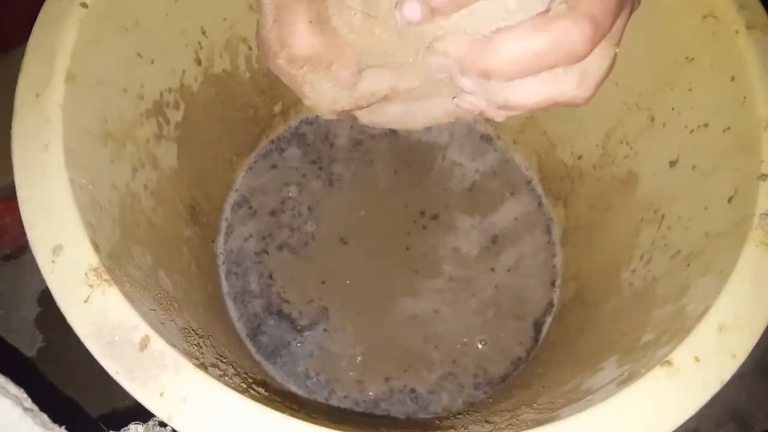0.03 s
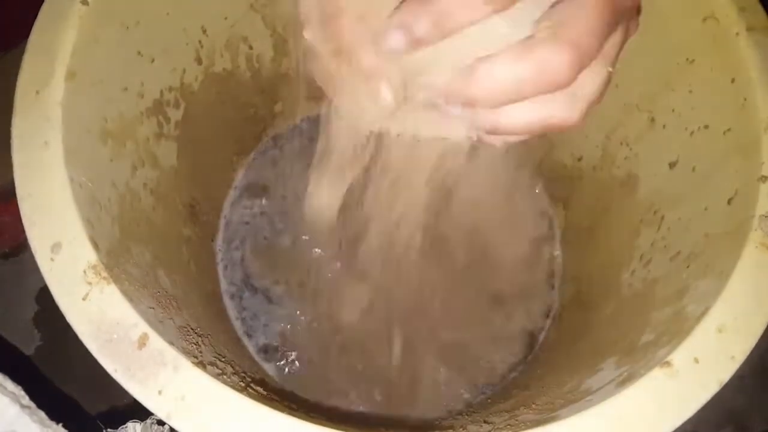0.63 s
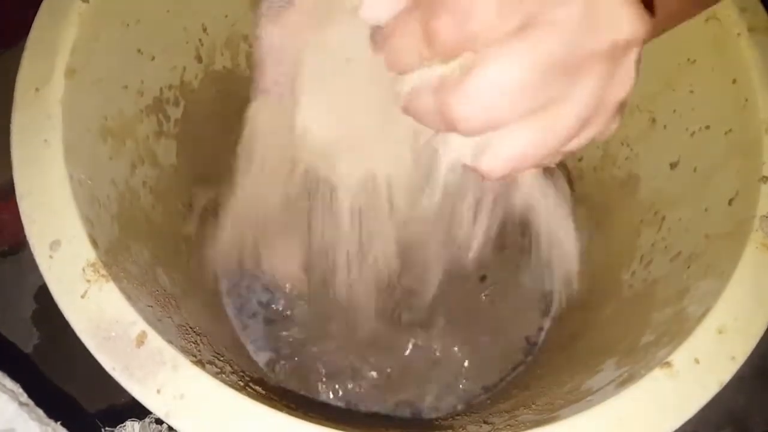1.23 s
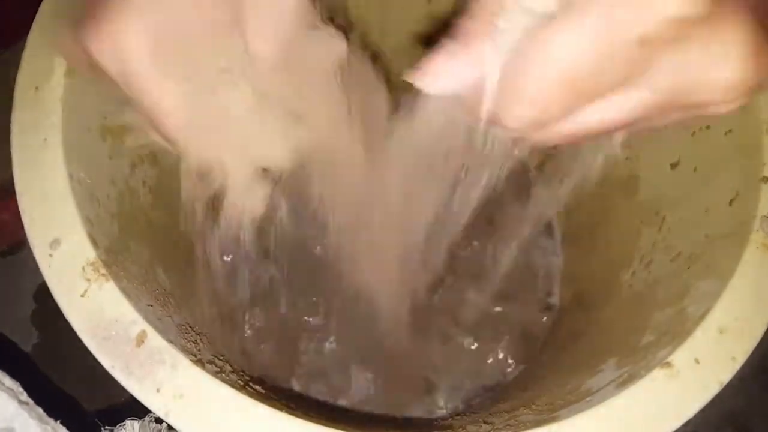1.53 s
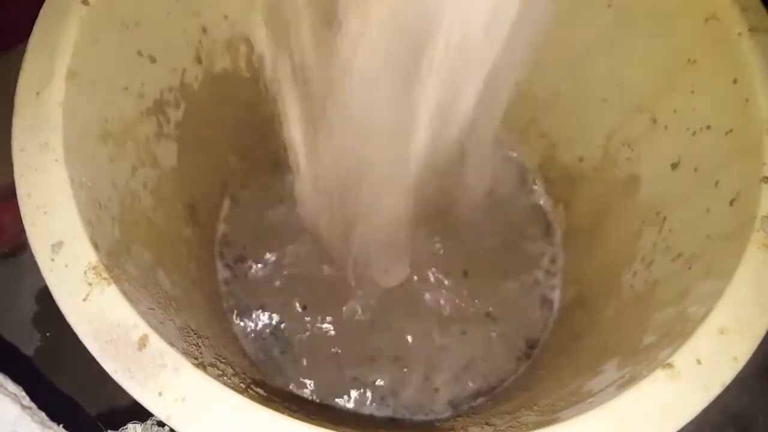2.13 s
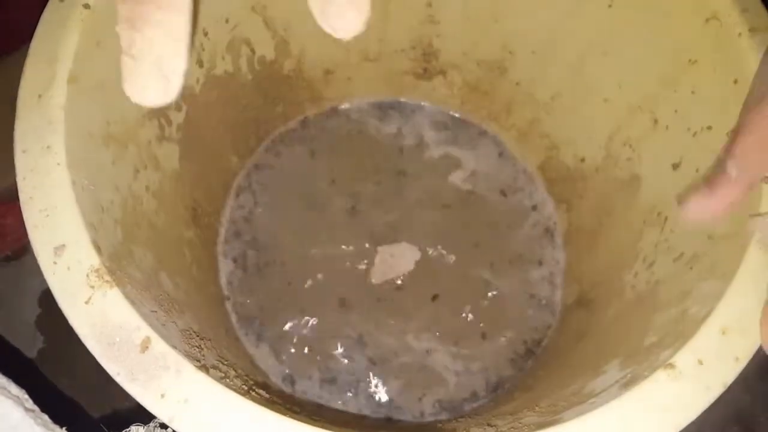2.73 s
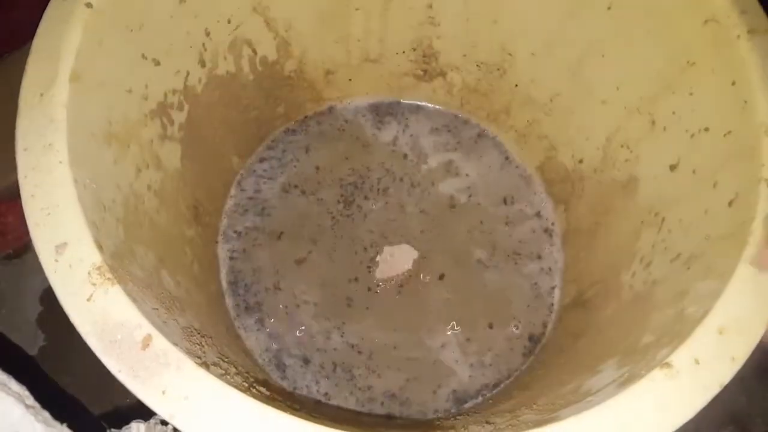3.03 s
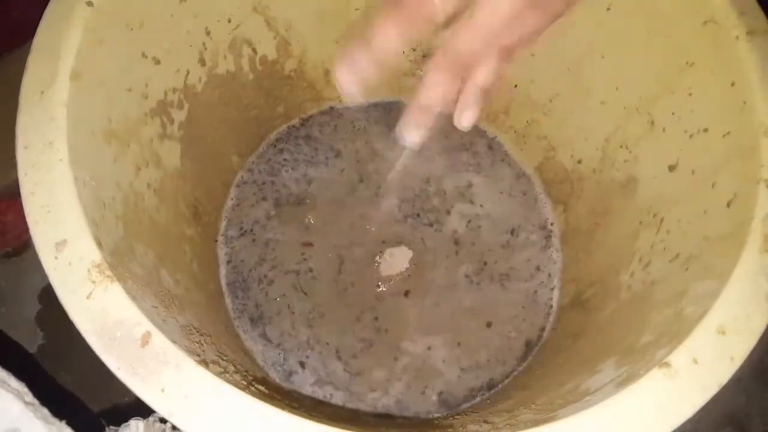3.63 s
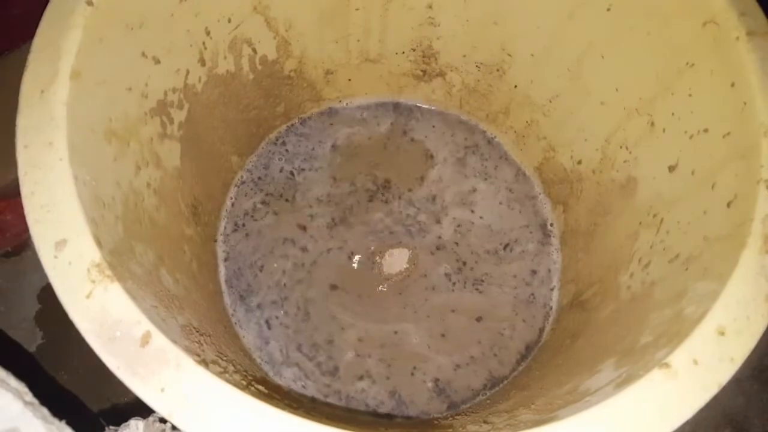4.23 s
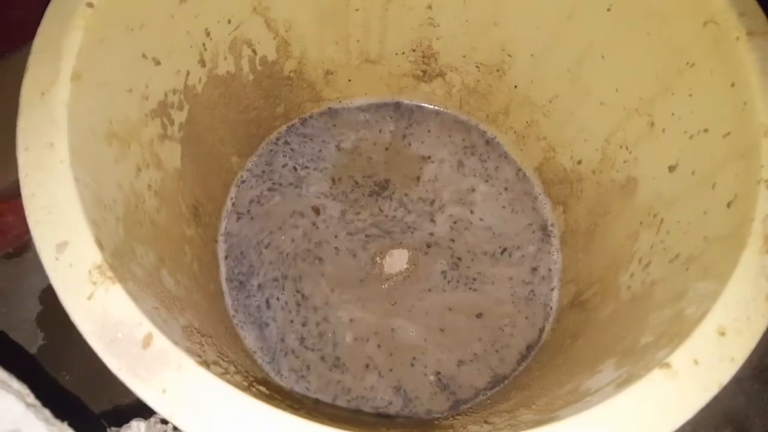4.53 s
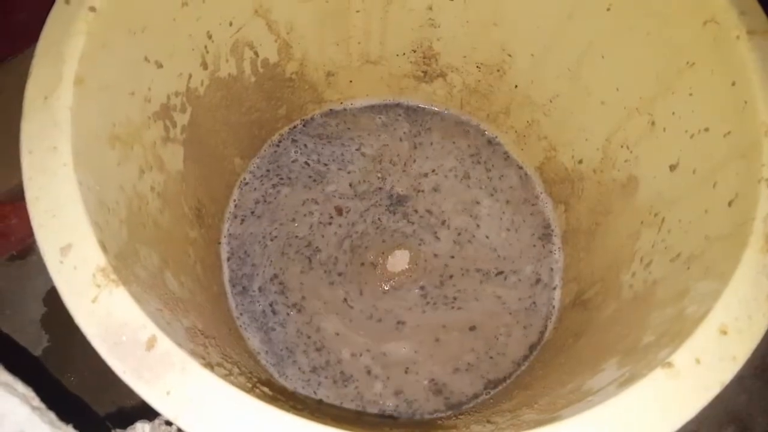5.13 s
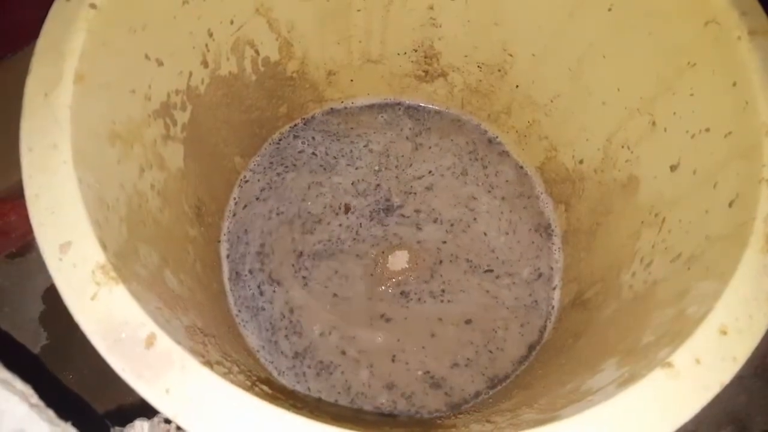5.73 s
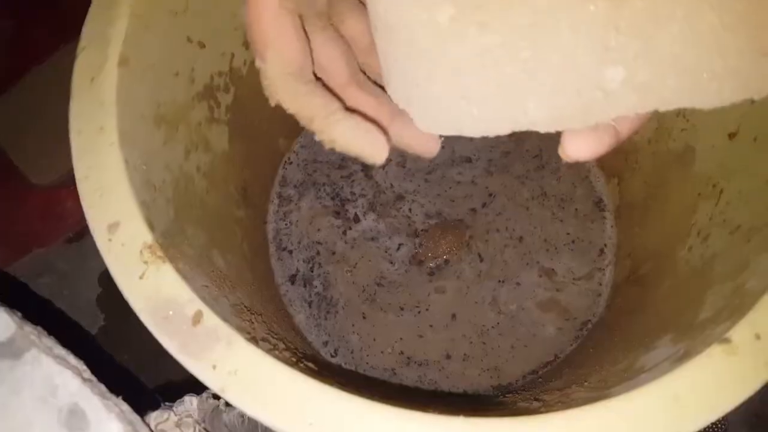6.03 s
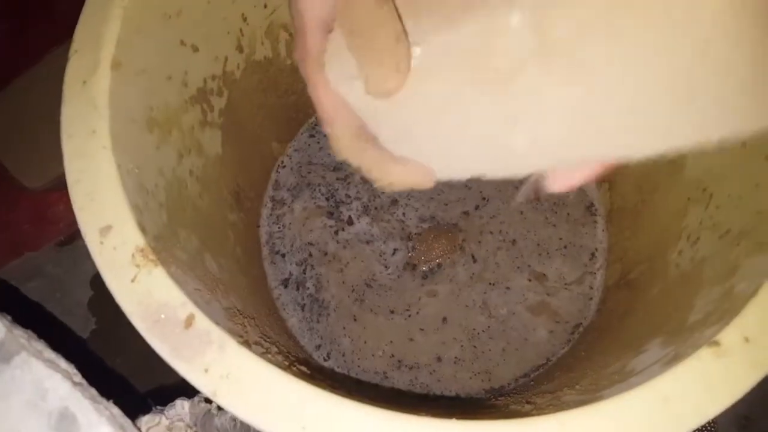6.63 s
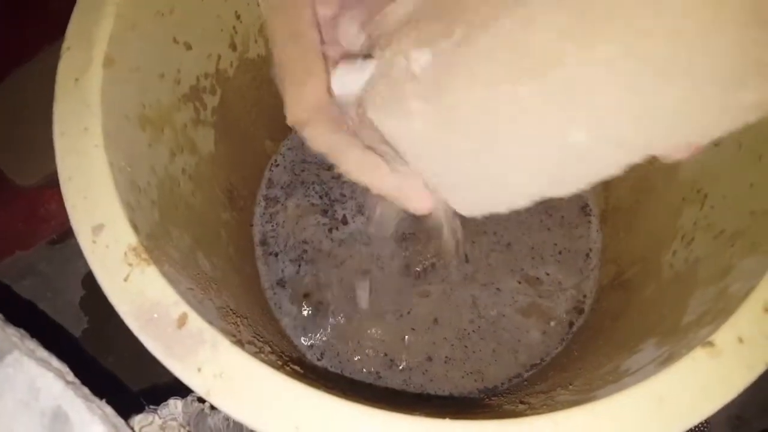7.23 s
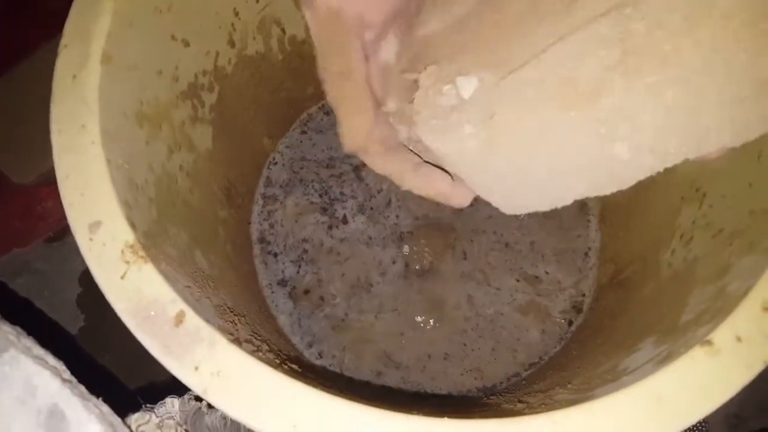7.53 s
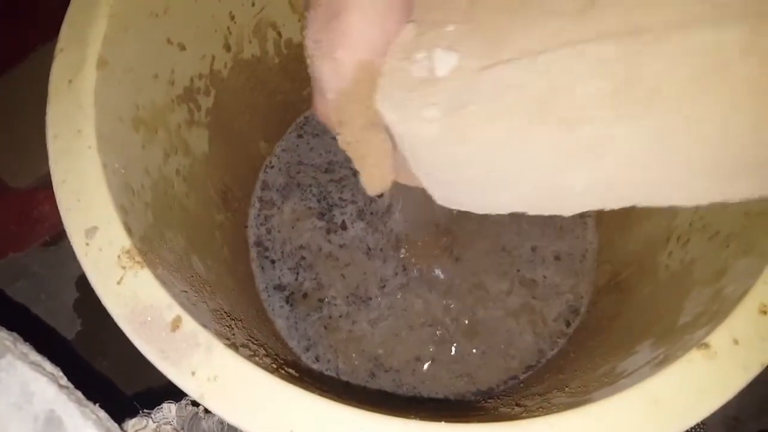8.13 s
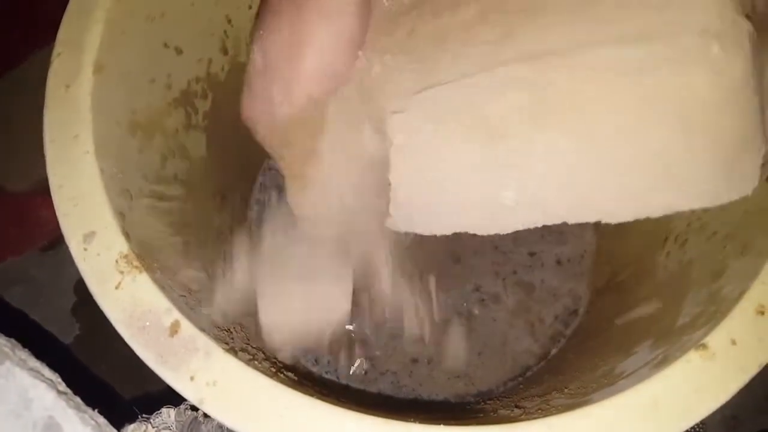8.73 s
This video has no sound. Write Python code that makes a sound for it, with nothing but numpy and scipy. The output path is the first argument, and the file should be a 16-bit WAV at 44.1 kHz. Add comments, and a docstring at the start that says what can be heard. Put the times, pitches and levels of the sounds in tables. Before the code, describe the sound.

From about 0.3 seconds, a block of dry sand crumbles close by into a plastic tub of water: brittle cracks, a grainy hiss, a fizz of small bubbles and many quick plops. The pour surges unevenly, with a low gurgle around 2 seconds, and dies away by 2.7. Light crumbs and soft brushes of sandy hands follow, with a sharp tick near 3.6 and a few small plops near 3.9. After a lull, a second block grinds faintly against the palms from about 6 seconds, shedding specks with small ticks and plinks. At 8.7 it cracks, and lumps fall in with a brief hiss and two loud plops. Throughout, a nearby cricket chirps high and evenly, about eight times a second, echoing slightly off the yard walls, with distant crickets, a faint low rumble and an electrical hum behind.

```python
"""A hard-walled yard: hands crumble a block of dry sand over muddy water in a plastic tub, pause, then
start on a second block. The block cracks and sheds crumbs, lumps plop in, and the falling sand hisses
and drags air under in a fizz of small bubbles. A cricket ticks away nearby with strokes of its wings,
others farther off, over a low rumble and a mains hum."""
import sys
import numpy as np
from scipy import signal
from scipy.fft import rfft, irfft
from scipy.io import wavfile
from scipy.ndimage import uniform_filter1d

SR = 44100
rng = np.random.default_rng(int(sys.argv[2]) if len(sys.argv) > 2 else 0)


def dump_mix(stems):
    """Bounce the given channels to the path in sys.argv[1] as a 16-bit WAV at rate SR."""
    frames = np.atleast_2d(stems).T  # one column per channel
    limited = np.clip(frames, -1, 1)  # hard clip at full scale
    pcm = np.round(limited * 32767).astype(np.int16)
    wavfile.write(sys.argv[1], SR, pcm)


N = 388080
TIME = np.arange(N) / SR

# low sloshing reaches both microphones in step, higher rings out of step: f/Hz, phase gap/rad
PHASE_GAP = [(500, 0.073), (900, 0.3), (1200, 1.42), (1600, 1.87), (2500, 1.75)]


def from_db(db):
    return 10 ** (np.asarray(db) / 20)


def rms_one(x):
    return x / np.sqrt(np.mean(x ** 2) + 1e-20)


def together(*levels_db):
    """Level in dB of unrelated sounds heard at once."""
    return 10 * np.log10(sum(from_db(db) ** 2 for db in levels_db))


def in_time(rows):
    """Each column of an automation curve at every sample."""
    times, *columns = np.transpose(rows)
    return [np.interp(TIME, times, column) for column in columns]


def at_hz(points, hz):
    """Reads a curve on a log-frequency axis."""
    known_hz, values = np.transpose(points)
    return np.interp(np.log(np.maximum(hz, 1)), np.log(known_hz), values)


def colour(x, spectrum, size=4096):
    """Minimum-phase EQ with the given curve."""
    gain = from_db(at_hz(spectrum, np.fft.rfftfreq(size, 1 / SR)))
    cepstrum = irfft(np.log(gain))
    cepstrum[1:size // 2] *= 2
    cepstrum[size // 2 + 1:] = 0
    impulse = irfft(np.exp(rfft(cepstrum)))
    return signal.oaconvolve(np.atleast_2d(x), impulse[None], axes=1)[:, :N]


def drift(rate):
    """Random wobble of rms 1, changing about rate times a second."""
    knots = rng.standard_normal(8192)
    return rms_one(np.interp(TIME * rate, np.arange(len(knots)), knots))


def add(out, s, sound):
    """Mixes a short sound in at time s."""
    start = int(s * SR)
    first, last = max(start, 0), min(start + sound.shape[-1], N)
    if last > first:
        out[..., first:last] += sound[..., first - start:last - start]


def swells(rows, attack_share=0.17, release_share=0.21, least_release_s=0.0064):
    """Envelope in dB of events (t/s, length/s, level/dB); long ones swell and fade more slowly."""
    power = np.full(N, 1e-12)
    for s, length, db in rows:
        t = TIME[:int((2 * length + .2) * SR)]
        rise = 1 - np.exp(-t / (attack_share * length))
        fade = np.exp(-np.maximum(t - length, 0) / (least_release_s + release_share * length))
        add(power, s, (from_db(db) * rise * fade) ** 2)
    return 10 * np.log10(power)


def grains(per_s, spread_db):
    """Random clicks of uneven size."""
    sizes = from_db(spread_db * np.minimum(rng.exponential(1, N), 4)) * rng.choice([-1, 1], N)
    return sizes * (rng.random(N) < per_s / SR) / np.sqrt(per_s)


def resonators(clicks, low_hz, high_hz, cycles, count):
    """Each click rings one of count pitches, each with its own stereo spot, dying 60 dB over cycles."""
    out, dealt = np.zeros((2, N)), rng.integers(0, count, N)
    spots = rng.uniform(.6, 1.4, count) * rng.choice([-1, 1], count)
    for k, hz in enumerate(np.geomspace(low_hz, high_hz, count)):
        r, w = from_db(-60 * hz / (cycles * SR)), 2 * np.pi * hz / SR  # pole radius and angle
        strikes = clicks * (dealt == k) + 1e-18
        ring = signal.lfilter([w, -w * r * np.cos(w)], [1, -2 * r * np.cos(w), r * r], strikes)
        right_lag = int(spots[k] * at_hz(PHASE_GAP, hz) / w)
        out += [ring, np.roll(ring, right_lag)]
    return out


def reflections(x, t60_s, gap_s):
    """Dense dying echoes of unit energy, different at each microphone."""
    t = TIME[:SR // 4]
    tail = rng.standard_normal((2, len(t))) * from_db(-60 * t / t60_s) * (t > gap_s)
    tail /= np.sqrt(np.sum(tail ** 2, axis=1, keepdims=True))
    return signal.oaconvolve(np.atleast_2d(x), tail, axes=1)[:, :N]


def yard_ambience():
    """Distant rumble, nearly mono in the bass, with a wavering mains hum and a thin hiss."""
    # left-right likeness of the rumble: f/Hz, correlation
    likeness = [(50, 0.97), (150, 0.97), (300, .84), (600, 0.58), (1200, 0), (2500, 0)]
    # tone of the rumble: f/Hz, level/dB
    rumble_eq = [(25, -28), (43, -6.5), (70, -8), (95, -2.5), (150, -5.5), (200, -3.5), (320, -14.5),
                 (520, -12.5), (630, -19.5), (900, -16), (1400, -23.5), (2650, -29.5), (4500, -37.5),
                 (5800, -36), (9000, -86)]
    # partials of the hum: f/Hz, rms level/dB
    partials = [(100, -59.5), (200, -60.5), (350, -67), (445, -67)]
    # tone of the hiss: f/Hz, level/dB
    air_eq = [(3000, -41), (5500, -8), (7000, -1), (9000, -13), (12000, 1), (14500, 1), (16000, 5)]
    alike = at_hz(likeness, np.fft.rfftfreq(N, 1 / SR))
    mid, side = rfft(rng.standard_normal((2, N)))
    noise = irfft(np.sqrt(1 + alike) * mid + np.sqrt(1 - alike) * side * [[1], [-1]], N)
    rumble = from_db(-49) * rms_one(colour(noise, rumble_eq))
    hum = sum(from_db(db) * np.sqrt(2) * np.sin(2 * np.pi * hz * TIME + .5 * drift(5.4))
              for hz, db in partials)
    air = from_db(-65) * rms_one(colour(rng.standard_normal((2, N)), air_eq))
    return rumble + hum + air


def far_crickets(hz=7250, width_hz=750):
    """Distant crickets merge into one flickering band, louder on the right."""
    # strength of the chorus: t/s, level/dB
    chorus = [(0, -48), (2.5, -53), (5.9, -53), (7.2, -50.5), (8.8, -50.5)]
    band = signal.butter(2, [hz - width_hz / 2, hz + width_hz / 2], "band", fs=SR, output="sos")
    song = rms_one(signal.sosfilt(band, rng.standard_normal((2, N))))
    return song * from_db(in_time(chorus)[0] + 0.27 * drift(50) + np.array([[-7], [-1]]))


def chirp_times():
    """The near cricket keeps a steady pace in runs, and stumbles once."""
    # runs of chirps: t/s, period/s
    runs = [(.01, .1314), (.93, .1242), (2.299, .1229), (3.778, .1252), (4.404, .1228), (5.018, .1254),
            (5.762, .107), (5.869, .1225), (6.981, .1235), (7.84, .1229)]
    ends = [s for s, period in runs[1:]] + [N / SR]
    return np.concatenate([np.arange(s, end - period / 2, period)
                           for (s, period), end in zip(runs, ends)])


def near_cricket(wing_hz=7260, fall_hz=220, stroke_s=0.00229, lead_s=.0203, lead_db=-1.5, rough=0.45):
    """Two quick wing strokes per chirp, each a rough tone that falls in pitch; the walls draw them out."""
    # resonance of the wings: f/Hz, level/dB
    wing_eq = [(5200, -35), (6000, -14), (6600, -0.5), (7300, -4), (7900, 1), (8300, -43), (9200, -42),
               (11500, 8), (14500, 0)]
    # strength of the song: t/s, level/dB, left re right/dB
    song = [(0, -33.5, -14), (2.5, -33.5, -8), (3.8, -32.5, -10), (5.5, -35, -7.5), (6, -37.5, -4),
            (7, -35.5, -8), (8.8, -35.5, -8)]
    chirps, t = np.zeros(N), TIME[:SR // 50] - .01
    for s in chirp_times():
        for ahead_s, stroke_db in ((lead_s, lead_db), (0, 0)):
            noise = rng.standard_normal((2, len(t)))
            jitter, shimmer = rms_one(uniform_filter1d(uniform_filter1d(noise, size=28), size=20))
            hz = wing_hz + rng.normal(0, 60) - fall_hz * t / stroke_s
            phase = 2 * np.pi * np.cumsum(hz) / SR + rough * jitter
            tone = (np.sin(phase) + from_db(-29) * np.sin(2 * phase)) * (1 + rough * shimmer / 2)
            # the wings touch lightly before and after the hard middle of the stroke
            pressure = np.exp(-(t / stroke_s) ** 2 / 2) + 0.1 * np.hanning(len(t))
            add(chirps, s - ahead_s + t[0], from_db(stroke_db + rng.normal(0, 0.66)) * tone * pressure)
    chirps = colour(chirps, wing_eq)
    turn = 1.4 * drift(2.9)  # small movements shift the pattern of echoes
    echoes = sum(reflections(chirps * share, t60_s=0.2, gap_s=0.0034)
                 for share in (np.cos(turn), np.sin(turn)))
    direct = from_db([[-3], [-1]]) * chirps
    level_db, left_db = in_time(song)
    return (direct + from_db(2.5) * echoes) * from_db([level_db + left_db, level_db])


def tub(x):
    """Sound flutters briefly between the plastic walls; the right side loses treble."""
    # shading of the right microphone: f/Hz, level re left/dB
    shade_eq = [(500, 0), (2100, -1), (3000, 0), (4500, -2.5), (7000, 2.5), (8300, -8.5), (9500, -7),
                (11200, -13), (13000, 0), (16000, -22)]
    left, right = x + from_db(-6) * reflections(x, t60_s=0.03, gap_s=0.00209)
    return np.vstack([left, colour(right, shade_eq)])


def handling():
    """The second block grinds dully against the palms."""
    # the block shifting in the hands: t/s, length/s, level/dB
    shifts = [(5.6, 5.5, -56)]
    grind_eq = [(120, -20), (250, 16), (520, 3.5), (900, -3.5), (2000, -34)]  # f/Hz, level/dB
    grind = colour(grains(3000, spread_db=5.5), grind_eq)
    return rms_one(grind) * from_db(swells(shifts))


def rustle():
    """Sandy skin brushes over sand with a dull, grainy sound."""
    # strokes of the hands: t/s, length/s, level/dB
    strokes = [(.08, .07, -53), (2.73, 0.091, -56.5), (3.02, 0.054, -56), (3.82, .08, -57.5),
               (6.56, 0.16, -61), (6.84, 0.13, -59.5), (7.2, 0.37, -61.5), (7.82, 0.37, -60),
               (8.58, 0.033, -48.5), (8.72, .08, -49)]
    skin_eq = [(500, -8), (850, 3), (1500, 0), (2400, -6.5), (5000, -8)]  # f/Hz, level/dB
    rub = resonators(grains(5000, spread_db=3.5), low_hz=700, high_hz=2450, cycles=6.7, count=10)
    return rms_one(colour(rub, skin_eq)) * from_db(swells(strokes) + 2.5)


def crumbs(level_db):
    """Single crumbs each trap one tiny, clear-ringing bubble."""
    pings = resonators(grains(200, spread_db=1.5), low_hz=2063, high_hz=5400, cycles=27, count=18)
    return rms_one(pings) * from_db(level_db + 3)


def gulp(flutter_db=2.5):
    """The hollow that the heaviest fall digs in the water grows, so its note sinks."""
    # note of the hollow: t/s, f/Hz, level/dB
    note = [(1.75, 394, -119), (1.85, 324, -46), (2.0, 293.3, -80), (2.12, 232, -46), (2.25, 221, -53),
            (2.33, 205, -79)]
    hz, level_db = in_time(note)
    phase = 2 * np.pi * np.cumsum(hz + 10 * drift(40)) / SR
    return np.sin(phase) * from_db(level_db - flutter_db * drift(37))


def churn(flow_db):
    """The bulk of the sand folds in larger, duller bubbles, surging as heaps slump."""
    # whole heaps sliding into the water: t/s, length/s, level/dB
    slumps = [(.28, .5, -60), (1.82, 0.16, -44.5), (2.05, .27, -55), (8.76, 0.054, -45)]
    # tone of the gurgle: f/Hz, level/dB
    gurgle_eq = [(100, -25), (220, 4.5), (330, 5), (500, 4.5), (800, -5), (1400, -34), (3000, -28)]
    bubbles = resonators(grains(500, spread_db=3), low_hz=221, high_hz=807, cycles=10, count=11)
    return rms_one(colour(bubbles, gurgle_eq)) * from_db(together(flow_db, swells(slumps)))


def sand_hiss(level_db):
    """Fine grains rub and patter down in clumps."""
    # tone of the dry grains: f/Hz, level/dB
    hiss_eq = [(600, -15), (1000, -12.5), (2000, 1), (4000, 2), (6500, 0.5), (9000, 3.5), (10800, -2),
               (12500, -1.5), (16000, -2)]
    patter = np.array([grains(3500, spread_db=3.5) for side in range(2)])
    return rms_one(colour(patter, hiss_eq)) * from_db(level_db + 8.5 + 1.75 * drift(110))


def fizz(level_db):
    """Sand drags air under in clumps, and crowds of small bubbles ring."""
    # tone of the bubble crowd: f/Hz, level/dB
    fizz_eq = [(500, -37), (700, -7), (840, 2.5), (1100, 1), (1320, 0), (1550, 3), (2400, -1.5),
               (3200, -2.5), (5000, -4), (7000, -12.5), (10000, -41)]
    bubbles = resonators(grains(1500, spread_db=2.5), low_hz=764, high_hz=7120, cycles=28, count=32)
    return rms_one(colour(bubbles, fizz_eq)) * from_db(level_db + 2.6 + 2.6 * drift(60))


def cracks(rise_s=0.0016, t60_s=0.013, spread_db=3.5):
    """Each crack is a rush of tiny, uneven fractures that swells and dies within milliseconds."""
    # dry cracks of the block and sharp spatters: t/s, level/dB
    hits = [(0.128, -38), (.246, -42), (0.313, -27), (.3984, -27), (0.408, -30), (.5301, -24.5),
            (0.7377, -28), (0.963, -35), (1.107, -33), (1.192, -36), (1.3283, -29.5), (1.593, -32),
            (1.6324, -30), (1.7299, -28), (1.9513, -22.5), (2.023, -23), (2.0618, -35), (2.368, -39),
            (2.999, -43), (3.567, -26.5), (4.23, -50), (6.2197, -49), (6.4467, -50), (7.073, -36),
            (7.332, -44), (7.878, -37.5), (8.088, -38), (8.703, -29)]
    # brittle tone of a crack: f/Hz, level/dB
    crack_eq = [(600, -49), (2000, 9), (4000, 11), (6500, 19), (9000, 18.5), (16000, 8)]
    out, t = np.zeros((2, N)), TIME[:SR // 8]
    envelope = (1 - np.exp(-t / rise_s)) * from_db(-60 * t / t60_s)
    for s, level_db in hits:
        sizes = from_db(spread_db * np.minimum(rng.exponential(1, (2, len(t))), 4))
        fractures = rms_one(sizes * rng.standard_normal(sizes.shape))
        add(out, s, from_db(level_db - 6) * fractures * envelope)
    return colour(out, crack_eq)


def plops(cavity_rise_s=0.00061, slap_rise_s=0.00018):
    """Each lump slaps the air in the tub and opens a cavity whose ring sags as it deepens."""
    # lumps hitting the water: t/s, level/dB, cavity f/Hz, slap trim/dB
    lumps = [(0.284, -23.5, 1130, 11.5), (.286, -17, 2370, -10), (.351, -23.5, 1570, -13),
             (.369, -29, 840, -13), (0.386, -24.5, 1750, 3), (.3986, -20.5, 1580, 8),
             (.428, -23, 1620, -17), (.458, -24.5, 1130, 2.5), (.482, -27.5, 930, 3), (.5, -31, 1160, -12),
             (.5309, -16.5, 1480, 3), (.549, -17.5, 1640, 2), (.589, -27.5, 1170, -2),
             (0.642, -23, 1530, -1), (0.6649, -28.5, 836, 3), (.7365, -24.5, 2020, 1),
             (.748, -24.5, 1660, -19), (.769, -26, 950, -13), (.826, -31.5, 1060, -5),
             (.965, -30, 1030, -2), (1.023, -40, 880, -10), (1.194, -38, 1110, 12), (1.302, -33, 903, -10),
             (1.329, -25.5, 1640, -1), (1.364, -28, 2070, -8), (1.431, -27.5, 960, 3),
             (1.443, -24, 5000, -14), (1.47, -19, 1610, 2.5), (1.581, -23.5, 1007, -20),
             (1.618, -34, 930, -10), (1.6761, -27.5, 886, -23), (1.7304, -23, 1600, -13),
             (1.8458, -21, 1900, 9.5), (1.8978, -25, 937, -14), (1.916, -22.5, 1830, 0),
             (1.96, -25, 866, -14), (1.981, -25, 1910, 0), (1.9956, -18, 1530, -3),
             (2.0282, -20.5, 4950, 1.5), (2.06, -26.5, 1280, -2), (2.098, -33, 700, -8),
             (2.148, -30, 1020, -12), (2.2329, -28.5, 502, -16), (2.293, -25.5, 1175, -20),
             (2.463, -33, 1380, 3), (2.574, -36, 1110, -23), (3.002, -37, 3095, 4.5),
             (3.657, -39.5, 3280, -14), (3.826, -38, 3570, -19), (3.872, -36, 1086, -14),
             (3.873, -26, 1560, -7), (3.899, -37, 2400, -12), (6.221, -43, 5400, -16),
             (6.901, -35.5, 2350, 2), (6.94, -36, 4170, -16), (7.176, -42, 2640, -1),
             (7.283, -34.5, 1750, 5.5), (7.469, -37, 3060, -16), (7.491, -37, 3800, -16),
             (7.609, -37, 3180, -20), (7.896, -54, 1940, 19.5), (7.976, -50, 1850, 5),
             (8.03, -36.5, 1750, -10), (8.711, -34, 2450, 6), (8.762, -19.5, 1440, -5),
             (8.7919, -15, 1540, -1)]
    # small cavities ring for more cycles: f/Hz, cycles to -60 dB
    ring_cycles = [(500, 10), (900, 26), (1700, 19.5), (3500, 35)]
    # modes of the air in the tub: f/Hz, level/dB, t60/s
    tub_modes = [(840, -9, 0.025), (1530, 1.5, 0.0089), (1960, 0.5, 0.0073), (2935, -10, 0.0085),
                 (3900, -10, 0.0076)]
    out, t = np.zeros((2, N)), TIME[:SR // 12]

    def ring(hz, t60_s, rise_s, sag=0):
        """A dying sine of height 1, out of step at the two microphones."""
        phase = 2 * np.pi * np.cumsum(hz * (1 + sag * np.exp(-t / 0.00034))) / SR
        envelope = (1 - np.exp(-t / rise_s)) * from_db(-60 * t / t60_s)
        return np.sin([phase, phase - at_hz(PHASE_GAP, hz)]) * envelope / envelope.max()

    for s, level_db, hz, slap_db in lumps:
        cavity = ring(hz, at_hz(ring_cycles, hz) / hz, cavity_rise_s, sag=0.11)
        slap = sum((-1) ** k * from_db(db + rng.normal(0, 1.9)) * ring(mode_hz, t60_s, slap_rise_s)
                   for k, (mode_hz, db, t60_s) in enumerate(tub_modes))
        add(out, s, from_db(level_db + 2.5) * (cavity + from_db(slap_db - 7) * slap))
    return out


def scene():
    """Falling sand drives fizz, hiss and churning inside the tub; crickets and rumble lie around it."""
    # flow of falling sand: t/s, fizz level/dB, hiss level/dB
    pour = [(0.25, -66, -72), (0.29, -39, -50), (0.3, -38, -45.5), (0.4, -39, -43.5), (0.48, -47, -52),
            (0.56, -39, -46), (0.77, -38.5, -43.5), (0.92, -51, -55.5), (0.94, -42.5, -52.5),
            (1.2, -51.5, -54), (1.41, -34.5, -43.5), (1.51, -43.5, -48.5), (1.98, -35.5, -42),
            (2.34, -43, -50), (2.37, -42.5, -41.5), (2.39, -55, -48), (2.59, -60, -54), (2.68, -70, -73)]
    # pinches of loose crumbs: t/s, length/s, hiss level/dB, bubble level/dB
    pinches = [(0.0, 0.15, -59.5, -65), (0.085, 0.07, -62, -55.5), (2.57, 0.024, -53, -50),
               (2.621, 0.22, -64, -80), (2.858, 0.51, -68, -70), (3.435, 0.23, -63, -61.5),
               (3.695, .1, -66.5, -65), (3.78, 0.1, -54, -52.5), (3.888, 1, -75, -91),
               (4.22, 0.1, -65, -73), (6.527, 0.23, -65.5, -62.5), (6.813, 0.15, -59.5, -60),
               (6.93, 0.4, -63.5, -67), (7.29, 0.073, -59.5, -55), (7.39, .19, -58.5, -55.5),
               (7.647, .1, -60, -74), (7.783, 0.23, -61.5, -60), (8.039, .16, -56.5, -57),
               (8.212, 0.28, -67.5, -85), (8.575, 0.041, -54, -55), (8.684, 0.042, -50.5, -56),
               (8.744, 0.12, -45.5, -44)]
    fizz_db, hiss_db = in_time(pour)
    pouring = (TIME > pour[0][0]) & (TIME < pour[-1][0])
    churn_db = -53 + 0.58 * (fizz_db - fizz_db[pouring].mean())  # follows the flow with less swing
    fizz_db, hiss_db, churn_db = np.where(pouring, [fizz_db, hiss_db, churn_db], -np.inf)
    pinch_hiss_db = swells(np.array(pinches)[:, [0, 1, 2]])
    pinch_bubble_db = swells(np.array(pinches)[:, [0, 1, 3]])
    water = fizz(fizz_db) + crumbs(pinch_bubble_db) + churn(churn_db) + gulp() + plops()
    sand = sand_hiss(together(hiss_db, pinch_hiss_db)) + rustle() + handling() + cracks()
    return tub(water + sand) + near_cricket() + far_crickets() + yard_ambience()


def record(dry):
    """A steep low-pass cuts the top at 15.5 kHz."""
    return signal.sosfilt(signal.ellip(12, .1, 80, 15500, fs=SR, output="sos"), dry)


dry = scene()
out = record(dry)
dump_mix(out)
```